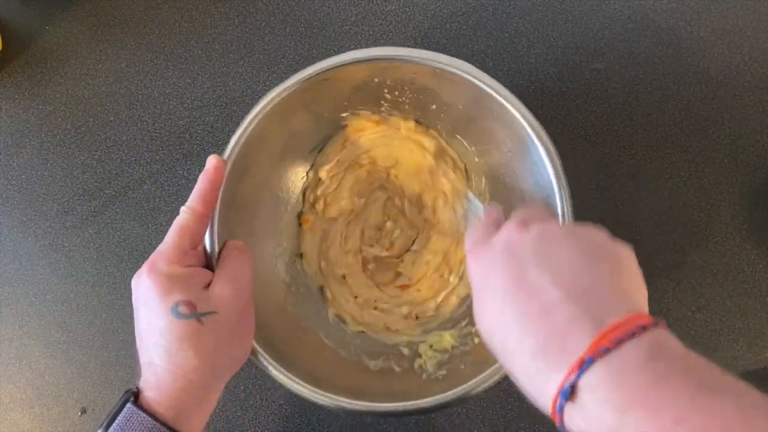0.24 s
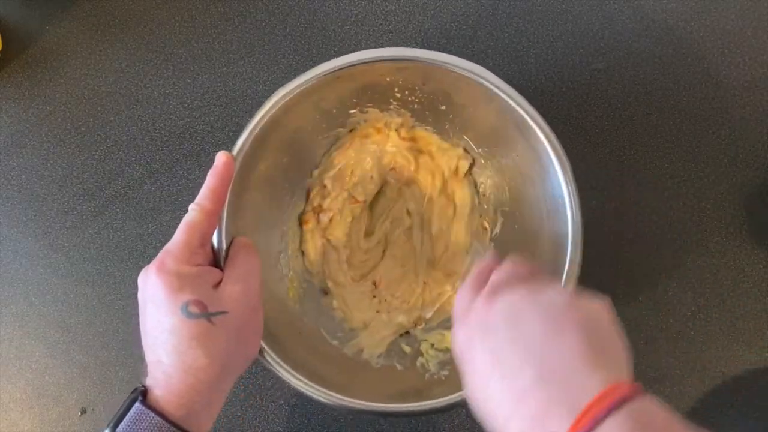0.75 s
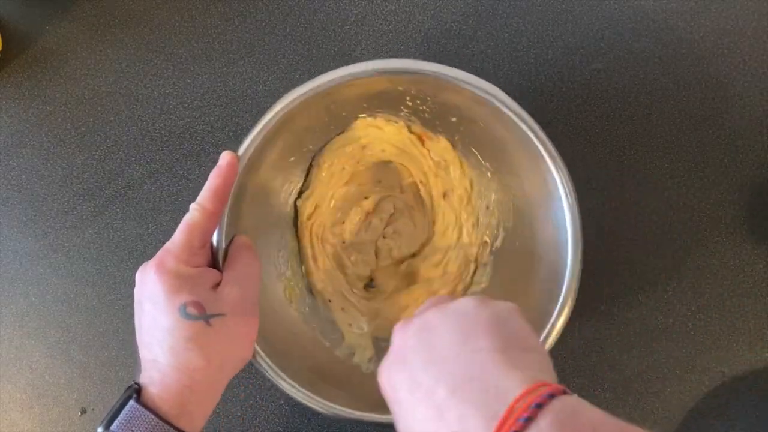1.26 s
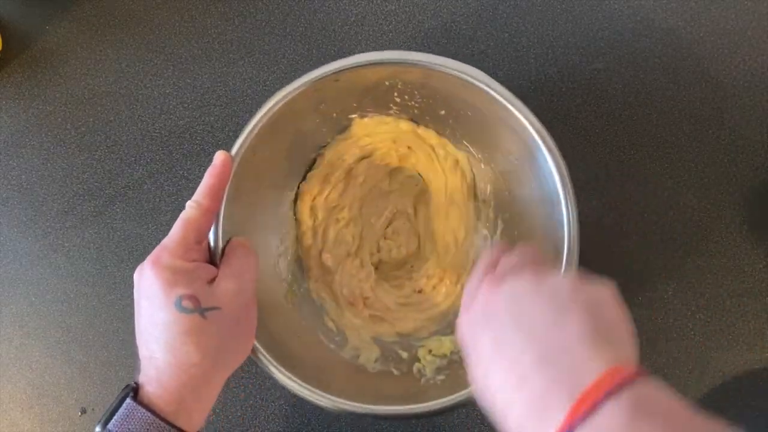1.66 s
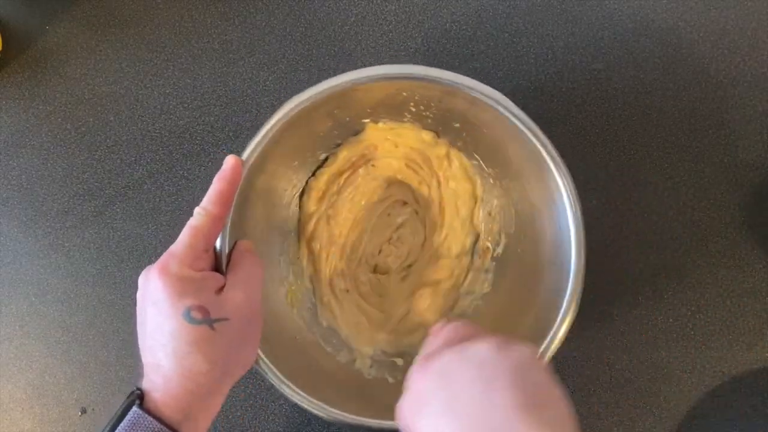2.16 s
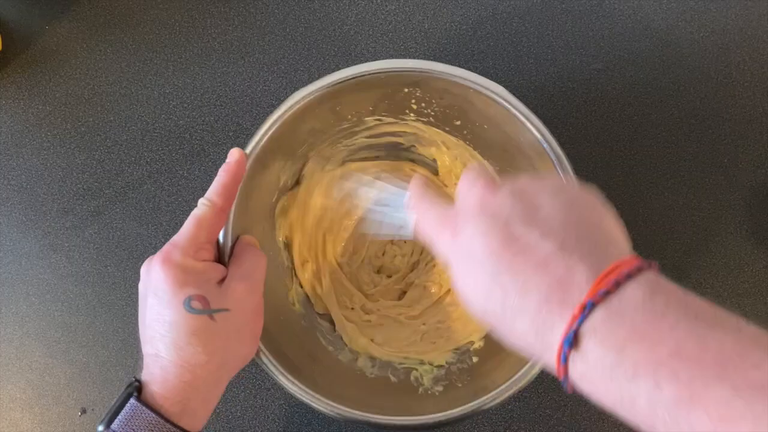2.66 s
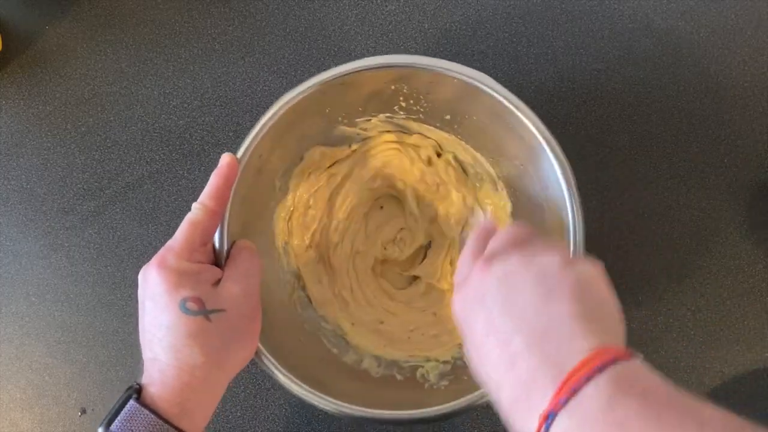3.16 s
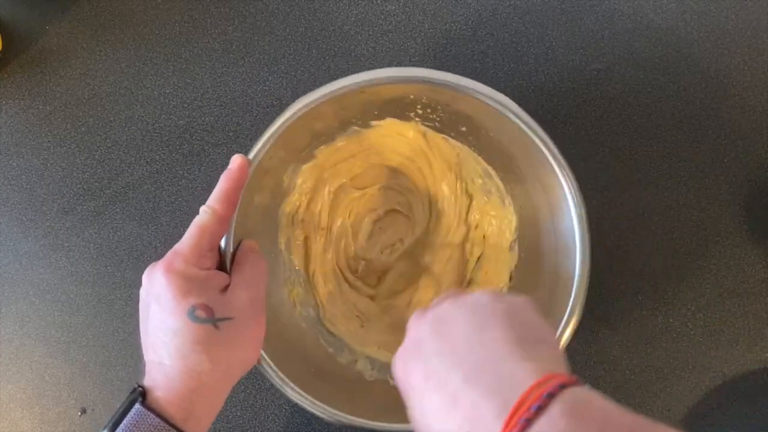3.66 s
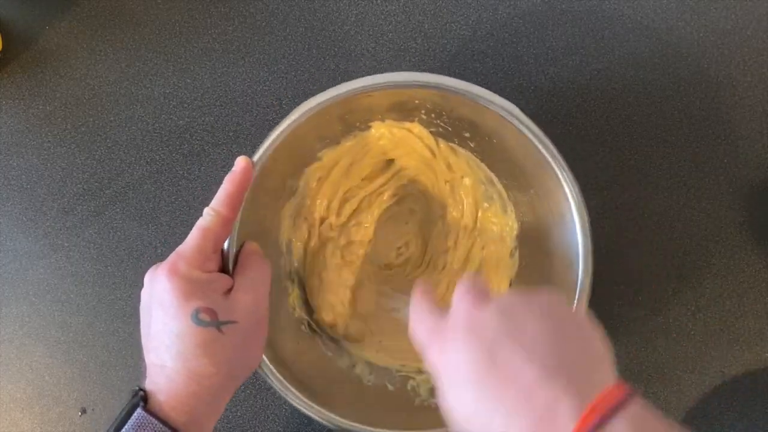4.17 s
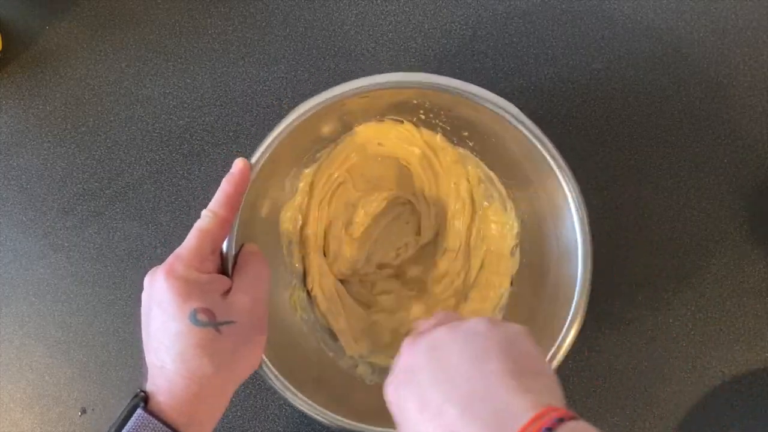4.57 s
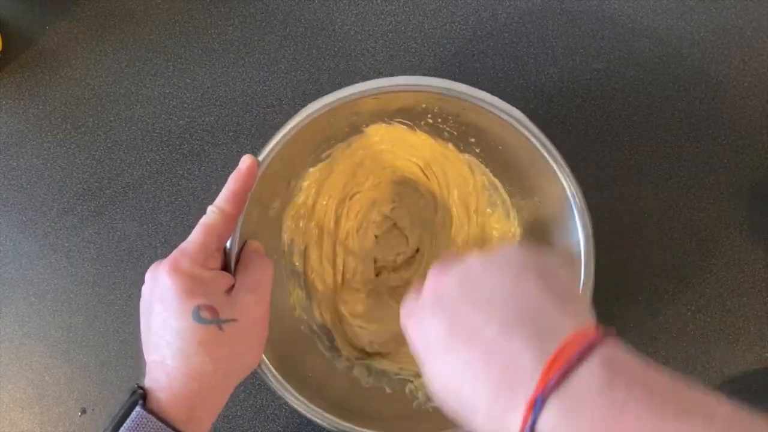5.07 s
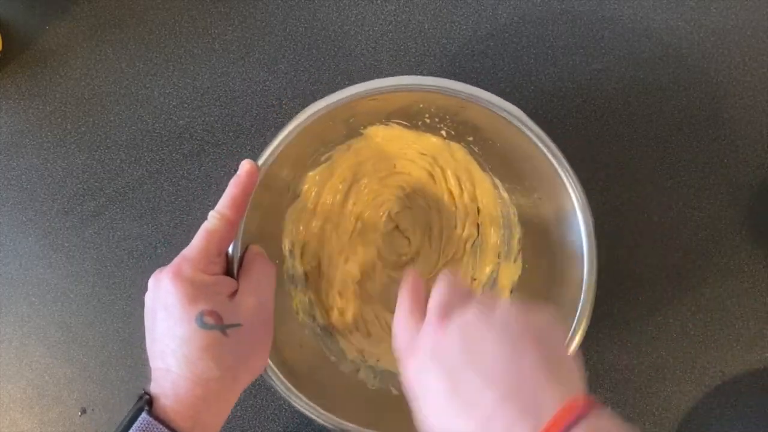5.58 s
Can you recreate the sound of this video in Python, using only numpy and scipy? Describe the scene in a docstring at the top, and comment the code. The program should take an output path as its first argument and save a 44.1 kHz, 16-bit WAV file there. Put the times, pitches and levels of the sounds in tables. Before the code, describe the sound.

Continuous hand whisking in a metal bowl, already under way at the start and not finished at the end. Moderate strokes grow louder near two seconds, the strongest comes around 2.7 after a brief lull, then lighter uneven strokes alternate with firm ones. Crisp metallic rattle, gritty scraping, muted bowl ring, low knocks on the counter; close, dry stereo pickup in a kitchen with faint rumble.

```python
"""Whisk wires clatter onto the wall of a steel bowl of thick sauce, then drag along it, about four times a second.
The wires are clusters of random clicks that also ring high modes, with passing squeaks and single flicks.
The damped shell rings briefly through its bending modes; the hand-held bowl thumps and rocks on the counter.
A steady low rumble lies beneath. Two close microphone ports listen."""
import sys
import numpy as np
from scipy import signal
from scipy.fft import rfft, irfft
from scipy.io import wavfile

SR = 44100
rng = np.random.default_rng(int(sys.argv[2]) if len(sys.argv) > 2 else 0)


def decibels_to_gain(level_db):
    """Convert a level in decibels to a linear amplitude gain (20 dB per decade)."""
    exponent = np.asarray(level_db, float) / 20
    return 10 ** exponent


def transcribe(u):
    """Save the signal u as a 16-bit wav file named by the first command-line argument.

    u: samples, shape (n,) or (channels, n), limited to [-1, 1]; the rate is SR.
    q: integer samples, one column per channel.
    """
    v = np.clip(np.atleast_2d(u).T, -1, 1)
    q = np.round(v * 32767).astype(np.int16)
    wavfile.write(sys.argv[1], SR, q)


N = 257014

# wires landing on the wall, levels relative within each layer:
# (time [s], rattle level [dB], clack level [dB], lower shell level [dB], upper shell level [dB])
LANDINGS = [(0.0034, -14.5, -33.5, -37, -20.5), (0.2093, -17, -28.5, -27, -20),
            (0.221, -14, -20.5, -33, -23), (0.409, -23, -34, -38, -48), (0.419, -12, -32, -33, -41),
            (0.4275, -25, -43, -50, -28), (0.5433, -26, -29.5, -54, -50), (0.5485, -16, -34, -18.5, -27.5),
            (0.6925, -23.5, -35, -46, -29), (0.7061, -13.5, -35, -20.5, -37), (0.9262, -21, -41, -40, -35),
            (0.9436, -15, -29.5, -25, -28), (1.1495, -16.5, -62, -64, -63),
            (1.171, -16.5, -27.5, -33, -27.5), (1.293, -35, -52, -39, -35.5), (1.3814, -25, -40, -40, -39),
            (1.4068, -14, -27, -32, -24), (1.5986, -39, -48, -24.5, -27), (1.615, -12.5, -24, -55, -24),
            (1.6248, -5.5, -18.5, -21, -17), (1.8421, -15, -21, -28.5, -26.5), (1.8497, -2, -16, -15, -33),
            (2.0655, -25, -36, -32, -30), (2.0763, -9.5, -25.5, -23, -20.5),
            (2.198, -25.5, -37.5, -46, -55), (2.229, -18.5, -34, -37.5, -34),
            (2.3088, -18, -39.5, -36, -41), (2.336, -11, -46.5, -42, -33), (2.6899, -1, -26, -25.5, -22),
            (2.6966, -17, -33, -21.5, -24.5), (2.7073, -21, -20.5, -28, -27),
            (2.8914, -35, -55, -26.5, -37), (2.929, -24, -37, -35, -30.5), (2.9457, -7.5, -22, -20.5, -23),
            (3.1398, -19, -34, -41, -40), (3.148, -5, -15.5, -21.5, -23), (3.3697, -19, -31, -29, -30.5),
            (3.42, -29, -44, -44, -55), (3.438, -26, -29, -32, -56), (3.4842, -23.5, -29, -49, -55),
            (3.591, -22, -36, -48, -33), (3.6675, -25, -29, -29, -45), (3.716, -25, -37, -39, -39),
            (3.746, -23.5, -42, -55, -42), (3.7854, -19, -36, -24.5, -29), (3.8074, -12, -28, -31, -21.5),
            (4.0109, -14, -34, -16.5, -21), (4.015, -4, -16.5, -23, -21), (4.2314, -11.5, -23, -19, -24),
            (4.2375, -5.5, -21.5, -23.5, -15), (4.374, -23, -33, -36, -45), (4.415, -26, -45, -54, -54),
            (4.4876, -23, -48, -36.5, -44), (4.5357, -31, -33.5, -34, -57), (4.602, -29, -39, -37, -58),
            (4.682, -26, -35, -43, -57), (4.7033, -18.5, -28.5, -32, -28), (4.79, -27, -28, -41.5, -36),
            (4.906, -26, -42, -47, -40), (4.927, -16, -24, -33, -20), (5.1467, -11.5, -28, -22.5, -17),
            (5.1527, -11.5, -27.5, -25.5, -18.5), (5.1587, -18, -34, -44, -27),
            (5.4113, -25, -41, -35, -38), (5.4289, -18.5, -28, -30, -29), (5.611, -28, -60, -45, -34),
            (5.6533, -16, -25, -23.5, -23)]
# strokes along the wall, long ones in several parts, each part lasting until the next;
# sag under 1 sinks early, over 1 holds and sinks late:
# (start [s], relative thump level [dB], first scrape level [dB], last scrape level [dB], sag [exponent])
STROKE_PARTS = [(0.0034, -29, -39.5, -53.5, 1.2), (0.214, -24, -38, -53.5, 3.2),
                (0.402, -32, -31.5, -54, 1.4), (0.5436, -26, -32.5, -61.5, 0.85),
                (0.6925, -35.5, -40, -63.5, 1.85), (0.9253, -28.5, -38.5, -46.5, 0.7),
                (1.059, -38, -43, -47, 1.7), (1.1526, -34, -38, -47, 0.51), (1.31, -42, -44.5, -59, 1.3),
                (1.3825, -29.5, -37, -59, 1.24), (1.6231, -24.5, -32.5, -56, 1.4),
                (1.8471, -20.5, -27, -52.5, 0.71), (2.0709, -24, -34.5, -44.5, 0.97),
                (2.2284, -50, -45, -47.5, 0.37), (2.314, -42, -32, -40, 0.43), (2.62, -53, -41, -56, 0.73),
                (2.6886, -20.5, -17, -52, 0.63), (2.938, -21, -29, -57, 1.02),
                (3.145, -21.5, -26.5, -50, .7), (3.3694, -29.5, -39, -47, 1.1),
                (3.57, -39, -43.5, -46.5, 1.5), (3.6684, -37, -44, -55, 2.5),
                (3.7881, -26, -35.5, -54.5, 0.87), (4.012, -24, -30.5, -57.5, 1.03),
                (4.234, -23, -25.5, -44.5, 0.33), (4.42, -57, -43.5, -45, 1.2),
                (4.5353, -33, -42, -48, 0.81), (4.7005, -26, -43, -49.5, 1.2),
                (4.919, -25, -41, -62.5, 1.53), (5.1447, -22, -26, -56.5, 0.77),
                (5.42, -28, -38.5, -48.5, 0.57), (5.6519, -28, -39, -48, 1.2), (5.79, -54, -46.5, -59, 1.3)]
# changes of rocking, treble, rub and hum within and between strokes:
# (time [s], rocking level [dB], extra treble [dB], extra rub [dB], extra shell hum [dB])
LAYER_CHANGES = [(0.0, -44, -4, -1, 3.5), (0.24, -37.5, -0.5, -1.5, 1), (0.52, -62, -6.5, -5.5, -5.5),
                 (0.7, -48.5, -7, 1.5, -5), (1.02, -42.5, 1.5, -1, 5.5), (1.62, -44.5, -2, -2, -6),
                 (1.8, -42, -6.5, 1, -13), (1.99, -40, -2.5, 4, 4.5), (2.28, -57, -4.5, -5.5, -3),
                 (2.41, -54, 0, -9, -16), (2.85, -45.5, -5.5, -1.5, -8.5), (3.01, -38, -4, -0.5, 3),
                 (3.14, -41.5, -8, -0.5, -1.5), (3.31, -34.5, -1.5, 0, 3.5), (3.63, -41, 1.5, 2.5, 3.5),
                 (4.05, -42.5, -3.5, 2.5, 0), (4.16, -43.5, -2, 0.5, 0.5), (5.07, -43.5, 0.5, 0.5, 1),
                 (5.2, -48.5, -3, -1.5, -6), (5.82, -43, 1, 4, 9)]
# click of steel on steel: (frequency [Hz], relative density [dB per Hz])
CLICK_COLOUR = [(760, -10), (1300, -18.5), (1540, -21), (1860, -8.5), (2160, -13), (2450, -13.5),
                (3100, -8.5), (3440, -7), (5040, -6.5), (5660, -8), (6490, -2), (7610, -4), (11000, -10),
                (15000, -7.5), (15800, -1.5), (16500, -23)]
# high modes of wires and rim: (frequency [Hz], relative level [dB], decay to -60 dB [s])
WIRE_MODES = [(2677, -9, 0.098), (2817, -0.5, 0.0075), (3222, 2, 0.033), (3624, -10, 0.063),
              (4180, -7.5, 0.03), (4190, -0.5, 0.041), (4960, -10, 0.047), (5030, -1.5, 0.046),
              (6120, 6, 0.024), (6230, -4, 0.16), (6370, 7.5, 0.021), (6030, -7, 0.049), (6680, 2.5, 0.077),
              (7640, 7, 0.023), (7150, 12.5, 0.0099), (8200, -4, 0.041), (8530, -41, 0.02)]
# single wires flicking the wall: (time [s], level [dB], pitch [Hz])
WIRE_FLICKS = [(0.3476, -22, 6320), (0.3955, -26, 4050), (0.5442, -19, 5800), (0.7694, -34, 4560),
               (1.0794, -32, 2650), (1.3094, -35, 5890), (2.6394, -25, 3890), (2.7794, -19, 6190),
               (2.8594, -25, 4600), (3.3094, -36, 5740), (4.4394, -33, 5740), (4.8294, -28, 4900),
               (5.7498, -24, 4930), (5.8144, -27, 6350)]
# bending modes of the shell: (frequency [Hz], relative level [dB], decay to -60 dB [s])
SHELL_MODES = [(332.2, -7, 0.14), (464, -5.5, 0.073), (562, 3, 0.099), (645, -5, 0.078),
               (791, -10.5, 0.067), (920, 2.5, 0.036), (1096, 1.5, 0.095), (1165.4, -0.5, 0.16),
               (1287, -4, 0.071), (1665, -5, 0.053), (1888, -7.5, 0.1)]
# bowl on the counter: (frequency [Hz], relative level [dB], decay to -60 dB [s])
COUNTER_MODES = [(62.6, -21, 0.4), (87.4, -5.5, 0.12), (104.6, -2, 0.16), (136.8, 0.5, 0.14),
                 (192.8, 0, 0.095), (225.7, -4.5, 0.21), (243.3, -10, 0.14)]
# room and counter hum: (frequency [Hz], relative density [dB per Hz])
RUMBLE_COLOUR = [(15, -48), (25, -19), (129, 3.5), (216, -5), (388, -18.5), (565, -8), (706, -21),
                 (1160, -15), (1500, -26), (1950, -60), (3300, -120)]
# left-right level difference: (frequency [Hz], left minus right [dB])
LEFT_RIGHT_BALANCE = [(60, -2), (200, 2.5), (700, -1), (2400, -1), (4400, -6.5), (8200, -5), (8700, 1),
                      (15000, -2)]
# left-right phase difference, nearly vanishing at the top: (frequency [Hz], lead of the left [rad])
LEFT_RIGHT_PHASE = [(0, 0), (600, -0.2), (1030, -0.9), (1640, 0.1), (3010, -1.1), (4480, -1.2),
                    (5170, -1.3), (6120, -4.0), (6460, -2.1), (6890, -1.9), (7840, -2.1), (8180, -1.8),
                    (8440, -0.1), (16400, 0.1)]
# how alike left and right are, the top being mono: (frequency [Hz], correlation [0 to 1])
LEFT_RIGHT_LIKENESS = [(60, 1), (300, 0.91), (700, 0.5), (2000, 0.47), (8200, 0.32), (9600, 1), (11500, 1)]

BITE_S = 0.024   # the scrape moves to its first level this long after a stroke or part starts
USUAL_SCRAPE_DB = -44
# layer settings at the usual scrape level [dB] and their change per dB of scrape;
# treble and rub count from the scrape, so negative slopes make them swing less than it does
TREBLE_DB, TREBLE_SLOPE = -4, -0.21
RUB_DB, RUB_SLOPE = -6, -0.38
HUM_DB, HUM_SLOPE = -49, 0.93
ROCKING_SLOPE = 0.36
# towards the end of each stroke or part of one, treble, rub and hum drop
END_S, END_TREBLE_DB, END_RUB_DB, END_HUM_DB = 0.042, -4, -1, -11.5


def rattle(times, blow_db, clack_db, scrape_db, bright_db, rub_db):
    """Wire contacts: a bare click each, the high modes ringing on, and coarser rubs below."""
    # wires arrive in loose clusters
    contacts = grains(9000, spread_db=4.0) * wander(2.44, step_s=0.004)
    # a short sharp crack, then a stronger, longer clatter
    crack = bursts(times, blow_db - 16, rise_s=0.0004, t60=0.016)
    clatter = bursts(times, blow_db - 11, rise_s=0.0012, t60=0.078)
    landing = contacts * (crack + clatter)
    # heavier wires drive the lower modes
    clack = contacts * bursts(times, clack_db + 1, rise_s=0.00085, t60=0.059)
    # fine hiss of slips, stuttering slightly as wires catch and let go
    drag = grains(7000, spread_db=2.0) * decibels_to_gain(scrape_db + 3.5) * wander(0.52, step_s=0.007)
    rub = drag * decibels_to_gain(rub_db + 6.5) * wander(2.0, step_s=0.015)
    bright_drag = drag * decibels_to_gain(bright_db + 6.0) * wander(3.0, step_s=0.024)
    bright_landing = landing * wander(2.1, step_s=0.0074)

    # three bands, crossing near 4.5 and 8.5 kHz; top of hits and scrape, and low rub, wander further
    hz = np.fft.rfftfreq(N, 1 / SR)
    top = 1 / (1 + (8500 / (hz + 1)) ** 8)
    low = 1 / (1 + (hz / 4500) ** 8)
    middle = 1 - low - top
    hiss = rfft(drag) * middle + rfft(bright_drag) * top + rfft(rub) * low * decibels_to_gain(0.5)
    hits = rfft(landing) * middle + rfft(bright_landing) * top * decibels_to_gain(-1.5)
    hits = hits + rfft(clack) * low * decibels_to_gain(4.0)
    colour = rms_one(decibels_to_gain(at_hz(CLICK_COLOUR, hz)))
    clicks = irfft((hits + hiss) * colour, N)

    lower_force = decibels_to_gain(-7) * clack + decibels_to_gain(-17.5) * rub
    upper_force = decibels_to_gain(-9.0) * landing + decibels_to_gain(-7.5) * drag
    lower = ring(lower_force, WIRE_MODES[:6], uneven_db=4.5, wander_s=0.017)
    upper = ring(upper_force, WIRE_MODES[6:], uneven_db=6.0, wander_s=0.018)
    ticks = grains(240, spread_db=3.0) * decibels_to_gain(scrape_db + rub_db - 5)
    return decibels_to_gain(0.5) * clicks + lower + upper + squeaks(decibels_to_gain(-16.0) * rub + ticks)


def squeaks(force):
    """Wires slipping on wet steel sing for a moment at passing pitches, some 22 cycles a ring."""
    pitches = [(hz, 0, 22.0 / hz) for hz in np.geomspace(1500, 8000, num=20)]
    return ring(force, pitches, uneven_db=6.5, wander_s=0.027)


def flicks():
    """One wire ticks and rings at a pitch of its own, falling 60 dB in 25 cycles."""
    out = np.zeros((2, N + SR))
    t = np.arange(SR // 20) / SR
    # share: how much of the tick enters the part that differs between left and right
    shares = rng.uniform(-1.4, 1, len(WIRE_FLICKS))
    for (s, db, hz), share in zip(WIRE_FLICKS, shares):
        first = round(s * SR)
        tick = decibels_to_gain(db - 60 * t * hz / 25) * np.sin(2 * np.pi * hz * t)
        out[:, first:first + len(t)] += tick * [[1], [share]]
    return out[:, :N]


def shell(times, blow_db, upper_db, hum_db):
    """Sparser, softer pushes bend the wall; where a blow lands sets the share of the upper modes."""
    pushes = grains(2000, spread_db=2.5)
    hum = decibels_to_gain(hum_db - 3.5)
    lower = pushes * (bursts(times, blow_db + 7.0, rise_s=0.0033, t60=0.031) + hum)
    upper = pushes * (bursts(times, upper_db + 5.5, rise_s=0.0021, t60=0.018) + hum * decibels_to_gain(-3.5))
    return (ring(lower, SHELL_MODES[:5], uneven_db=1.0, wander_s=0.04)
            + ring(upper, SHELL_MODES[5:], uneven_db=4.0, wander_s=0.045))


def thump(times, blow_db, rocking_db):
    """The whole bowl is knocked against the counter and rocks unevenly under the stroke."""
    rocking = grains(500, spread_db=4.5) * decibels_to_gain(rocking_db + 3.0)
    knocks = grains(1300, spread_db=0.5) * bursts(times, blow_db + 8.5, rise_s=0.00085, t60=0.051)
    return ring(rocking + knocks, COUNTER_MODES, uneven_db=3.0, wander_s=0.066)


def rumble():
    """Steady low hum of room and counter: coloured noise."""
    colour = rms_one(decibels_to_gain(at_hz(RUMBLE_COLOUR, np.fft.rfftfreq(N, 1 / SR))))
    return decibels_to_gain(-46.5) * irfft(rfft(rng.standard_normal((2, N))) * colour, N)


def scrape_level():
    """Each stroke or part of one moves quickly to its first level, then sinks or drifts to its last."""
    start, _, first_db, last_db, sag = np.transpose(STROKE_PARTS)
    t = np.arange(N) / SR
    k = np.maximum(np.searchsorted(start, t) - 1, 0)   # part under way
    since = t - start[k] - BITE_S
    length = np.diff(start, append=N / SR)[k] - BITE_S
    progress = np.clip(since / length, 0, 1) ** sag[k]
    sinking = first_db[k] + (last_db - first_db)[k] * progress
    # the bite starts from where the part before it ended
    before_db = np.append(first_db[0], last_db[:-1])[k]
    return sinking + (first_db[k] - before_db) * np.clip(since / BITE_S, -1, 0)


def nearing_end():
    """Rises exponentially to 1 over the last moments before each next stroke or part starts."""
    start = np.append(np.array(STROKE_PARTS)[:, 0], 1e3)   # a far-off start follows the last part
    t = np.arange(N) / SR
    return np.exp((t - start[np.searchsorted(start, t)]) / END_S)


def bursts(times, level_db, rise_s, t60):
    """Force envelope: each blow rises fast and dies away."""
    out = np.zeros(N + SR)
    t = np.arange(SR // 4) / SR
    shape = decibels_to_gain(-60 * t / t60) * (1 - np.exp(-t / rise_s))
    for s, db in zip(times, level_db):
        first = round(s * SR)
        out[first:first + len(t)] += decibels_to_gain(db) * shape
    return out[:N]


def grains(per_s, spread_db):
    """Two unrelated trains of random clicks of uneven size, rms 1."""
    sizes = decibels_to_gain(spread_db * np.minimum(rng.exponential(1, (2, N)), 4))
    sizes = sizes * rng.choice([-1, 1], (2, N))
    return rms_one(sizes * (rng.random((2, N)) < per_s / SR))


def ring(force, modes, uneven_db, wander_s):
    """Modes in parallel; the contact point travels, so each mode's strength wanders."""
    out, power = 0, 0
    for k, (hz, level_db, t60) in enumerate(modes):
        strength = wander(uneven_db, wander_s)
        r = decibels_to_gain(-60 / (max(t60, 0.003) * SR))   # pole radius
        w = 2 * np.pi * hz / SR
        gain = decibels_to_gain(level_db) * (-1) ** k   # neighbours alternate in sign
        resonator = [0, gain * np.sin(w)], [1, -2 * r * np.cos(w), r * r]
        out = out + signal.lfilter(*resonator, force * strength + 1e-18)
        power += gain ** 2 / (2 * (1 - r * r))
    return out / np.sqrt(power)   # power gain about 1 before the wandering


def wander(spread_db, step_s):
    """A gain that strays at random, gliding to a new value every step."""
    knots = np.arange(1600) * step_s
    return decibels_to_gain(np.interp(np.arange(N) / SR, knots, spread_db * rng.standard_normal(len(knots))))


def at_hz(points, hz):
    """Read a table on a log-frequency axis."""
    at, value = np.transpose(points)
    return np.interp(np.log(hz + 1), np.log(at + 1), value)


def rms_one(x):
    """Scale to rms 1."""
    return x / np.sqrt(np.mean(x ** 2) + 1e-20)


def left_and_right(common, apart):
    """Left and right share one part, the rest arrives in opposition; level and phase set them apart."""
    hz = np.fft.rfftfreq(N, 1 / SR)
    sign = np.array([[1], [-1]])   # left, right
    alike = np.clip(at_hz(LEFT_RIGHT_LIKENESS, hz), 0, 1)
    shared = np.sqrt((1 + alike) / 2) * rfft(common)
    opposed = sign * np.sqrt((1 - alike) / 2) * rfft(apart)
    turn = np.exp(sign * 0.5j * at_hz(LEFT_RIGHT_PHASE, hz))
    balance = decibels_to_gain(sign * at_hz(LEFT_RIGHT_BALANCE, hz) / 2)
    return irfft((shared + opposed) * turn * balance, N)


def scene():
    """Rattle, flicks, shell, thump and rumble, heard left and right."""
    blows, rattle_db, clack_db, shell_db, upper_db = np.transpose(LANDINGS)
    part_starts, thump_db = np.transpose(STROKE_PARTS)[:2]
    s, *columns = np.transpose(LAYER_CHANGES)
    changes = [np.interp(np.arange(N) / SR, s, column) for column in columns]
    rocking_db, extra_treble_db, extra_rub_db, extra_hum_db = changes
    scrape_db = scrape_level()
    swing = scrape_db - USUAL_SCRAPE_DB
    ending = nearing_end()
    bright_db = TREBLE_DB + TREBLE_SLOPE * swing + extra_treble_db + END_TREBLE_DB * ending
    rub_db = RUB_DB + RUB_SLOPE * swing + extra_rub_db + END_RUB_DB * ending
    hum_db = HUM_DB + HUM_SLOPE * swing + extra_hum_db + END_HUM_DB * ending
    bowl = rattle(blows, rattle_db, clack_db, scrape_db, bright_db, rub_db)
    bowl = bowl + shell(blows, shell_db, upper_db, hum_db)
    bowl = bowl + thump(part_starts, thump_db, rocking_db + ROCKING_SLOPE * swing)
    common, apart = bowl + flicks() + rumble()
    return left_and_right(common, apart)


def band_limit(x):
    """A steep low-pass at the top of the band."""
    return signal.sosfilt(signal.butter(12, 16820, fs=SR, output="sos"), x)


def record(dry):
    """The microphones cut the deep bass; the highest peaks are rounded and a steep cut removes the top."""
    bass_cut = signal.butter(3, 45, "high", fs=SR, output="sos")
    top_cut = signal.cheby2(12, 60, 16500, fs=SR, output="sos")   # 60 dB down from 16.5 kHz up
    x = signal.sosfilt(bass_cut, dry)
    rounded = 0.89 * np.tanh(x / 0.9)
    mix = signal.sosfilt(top_cut, rounded)
    return band_limit(mix)


dry = scene()
out = record(dry)
transcribe(out)
```